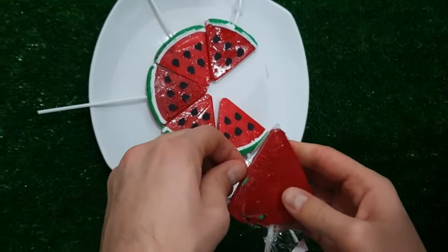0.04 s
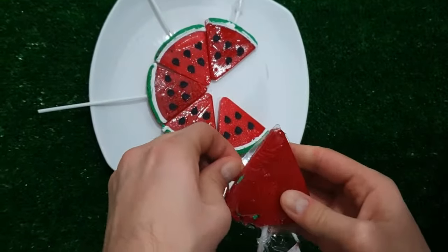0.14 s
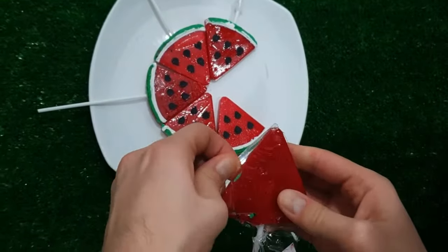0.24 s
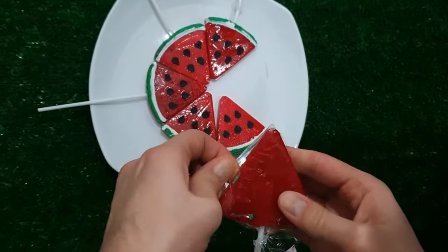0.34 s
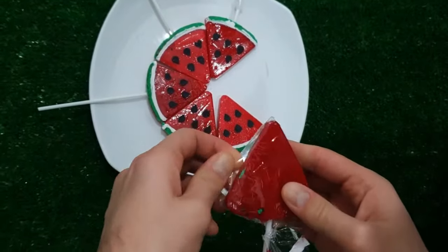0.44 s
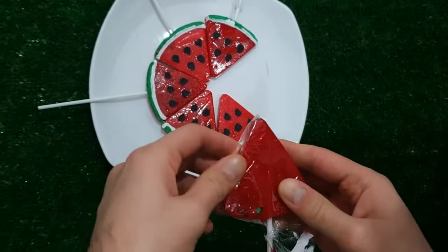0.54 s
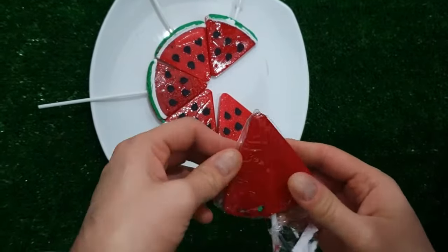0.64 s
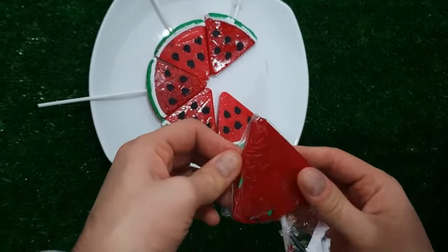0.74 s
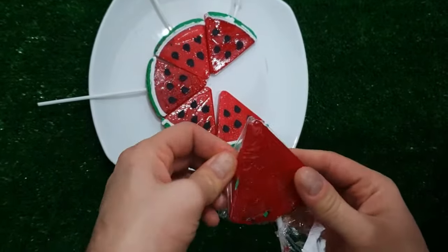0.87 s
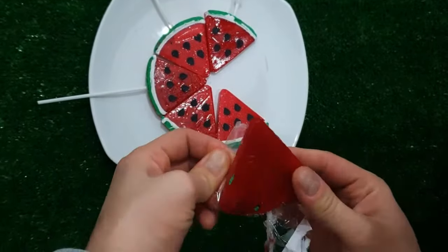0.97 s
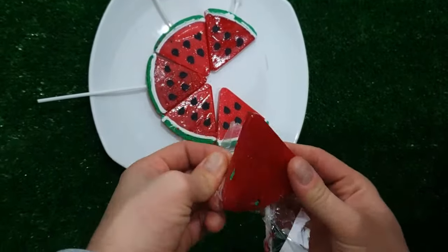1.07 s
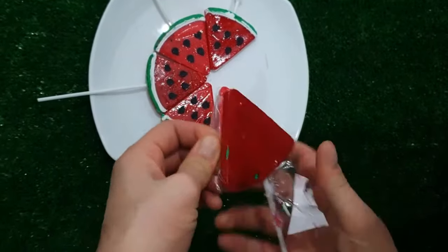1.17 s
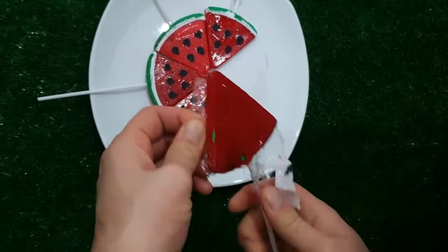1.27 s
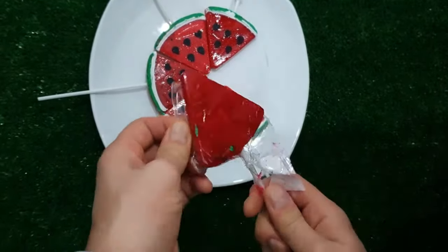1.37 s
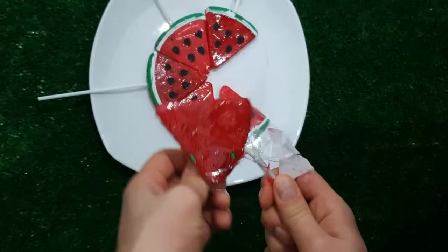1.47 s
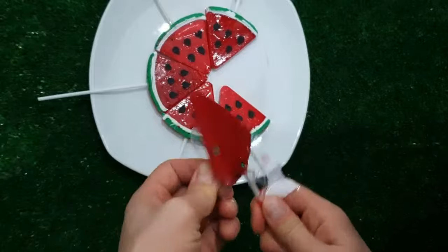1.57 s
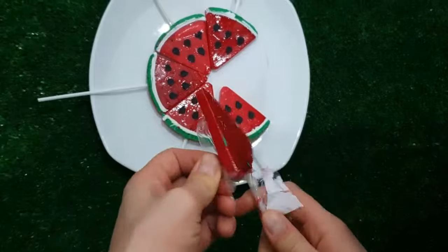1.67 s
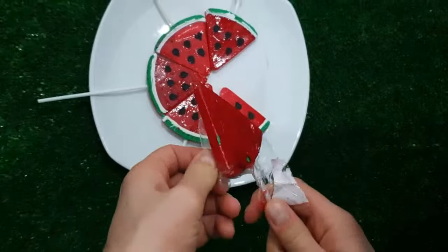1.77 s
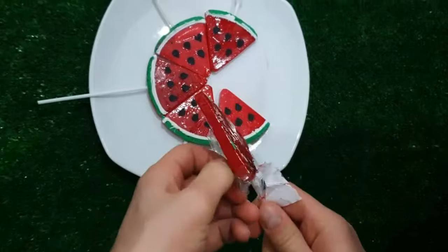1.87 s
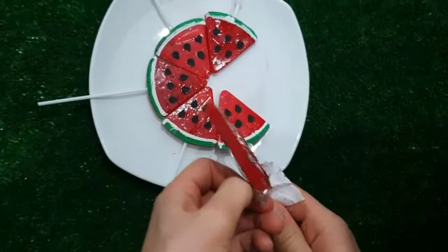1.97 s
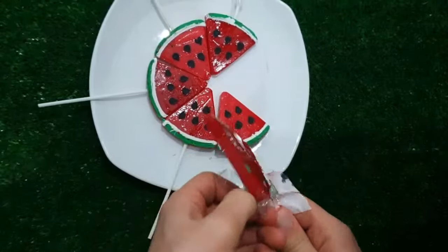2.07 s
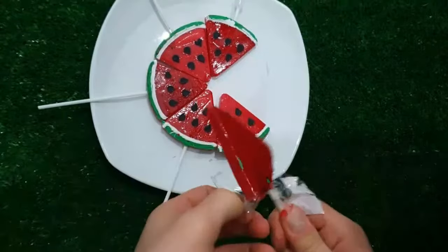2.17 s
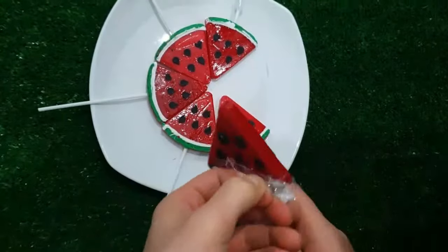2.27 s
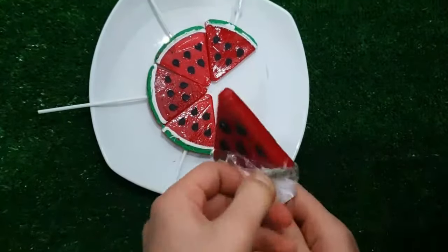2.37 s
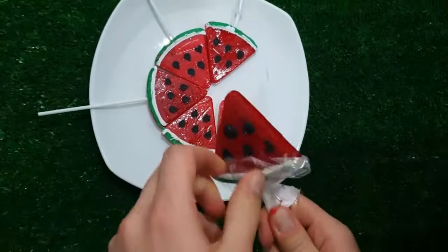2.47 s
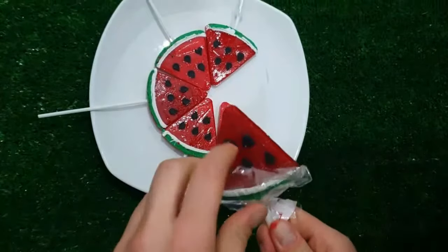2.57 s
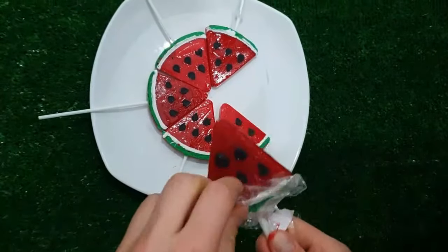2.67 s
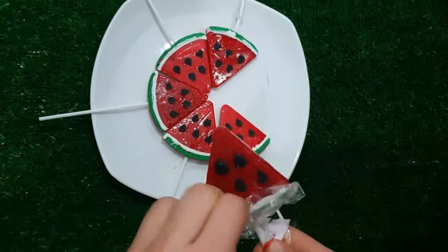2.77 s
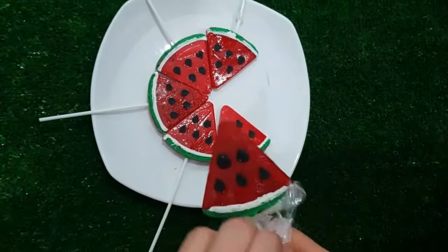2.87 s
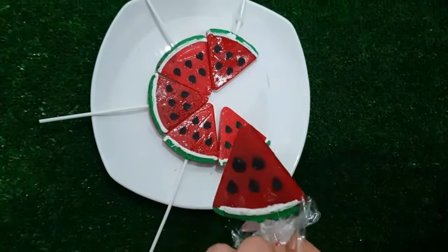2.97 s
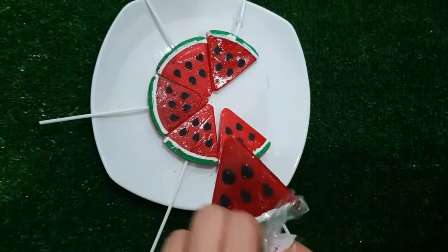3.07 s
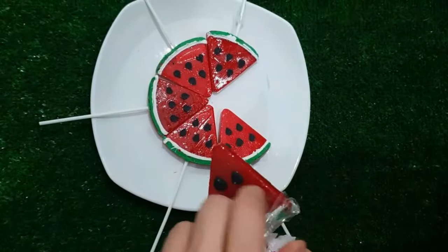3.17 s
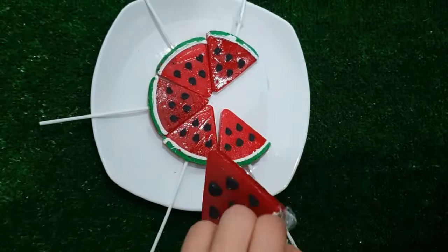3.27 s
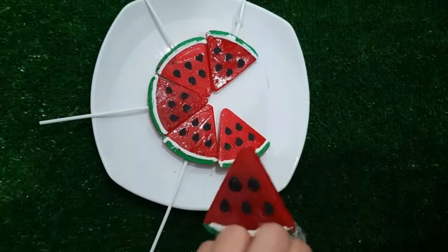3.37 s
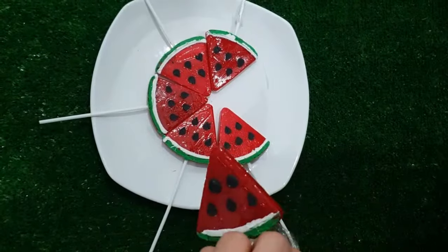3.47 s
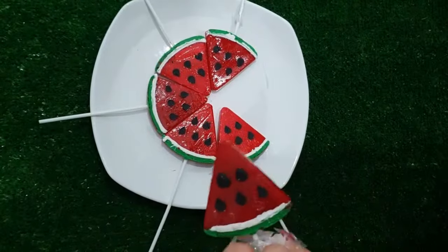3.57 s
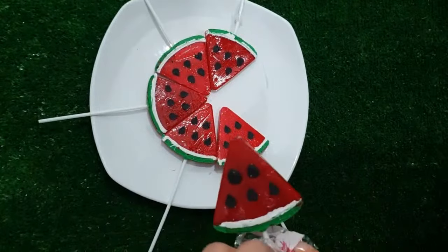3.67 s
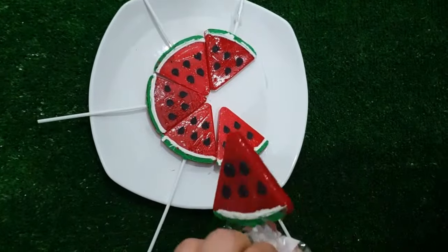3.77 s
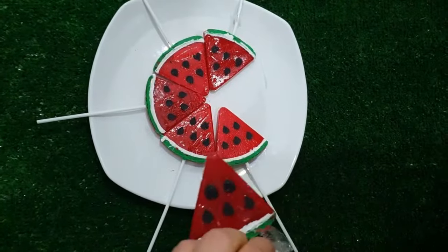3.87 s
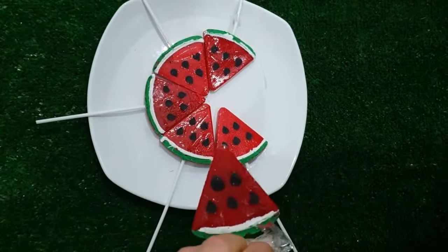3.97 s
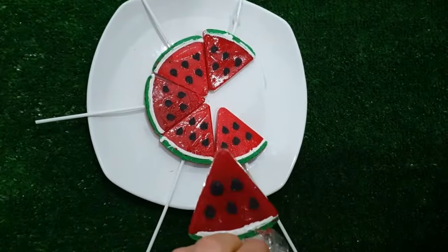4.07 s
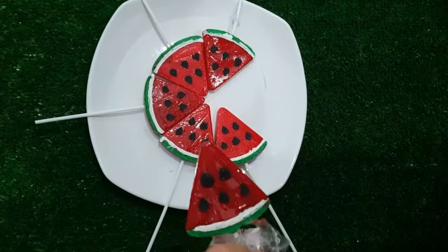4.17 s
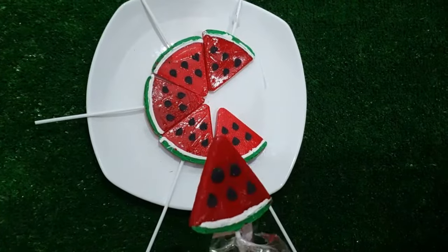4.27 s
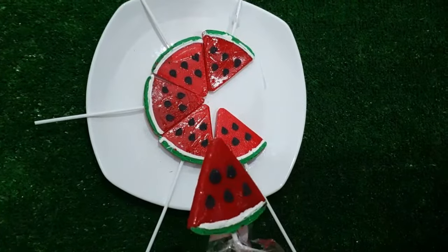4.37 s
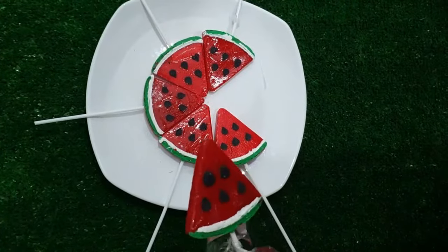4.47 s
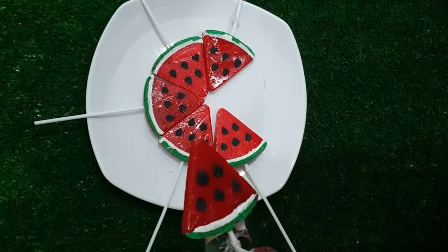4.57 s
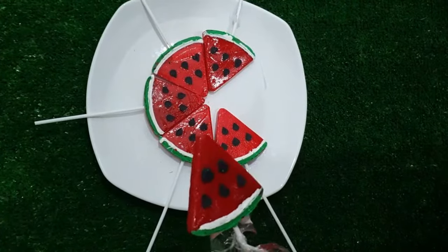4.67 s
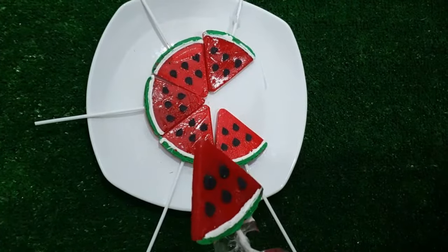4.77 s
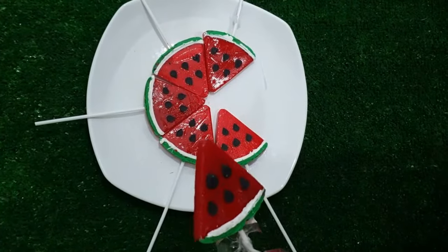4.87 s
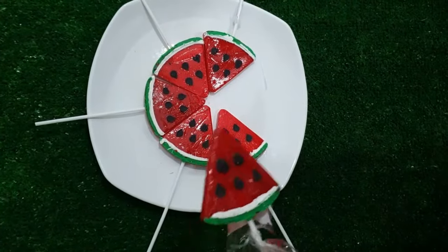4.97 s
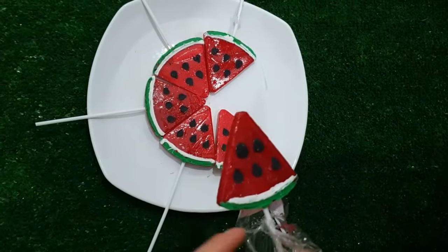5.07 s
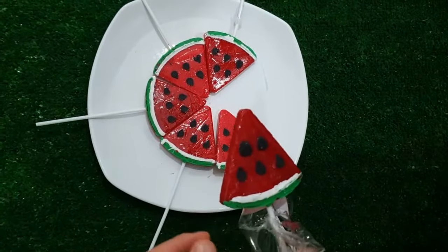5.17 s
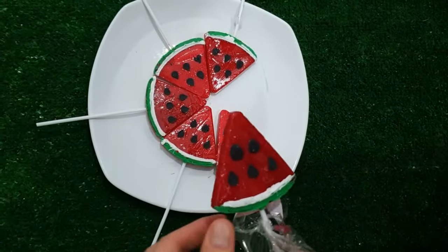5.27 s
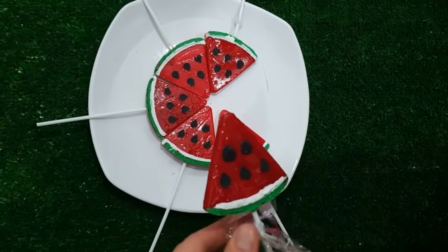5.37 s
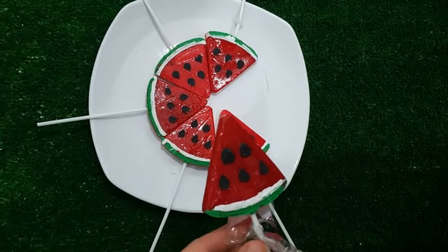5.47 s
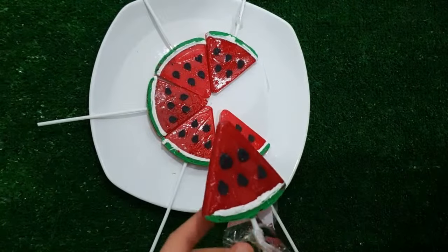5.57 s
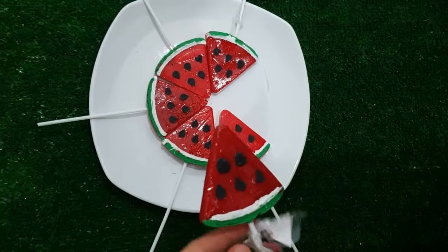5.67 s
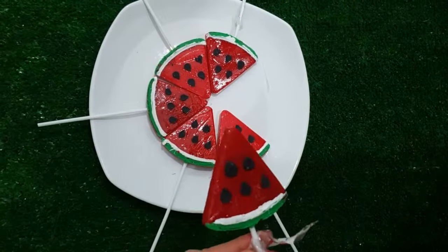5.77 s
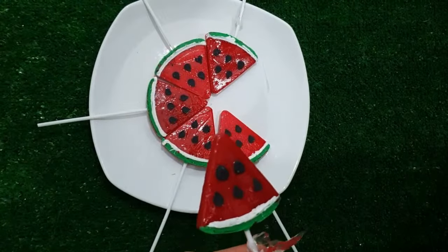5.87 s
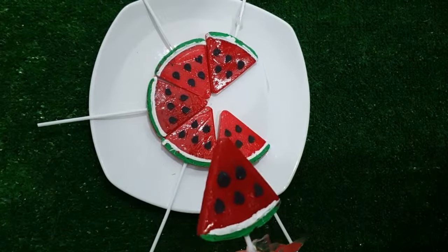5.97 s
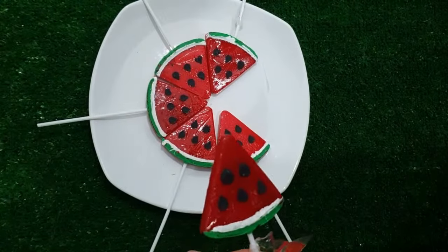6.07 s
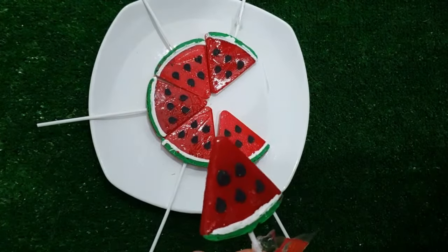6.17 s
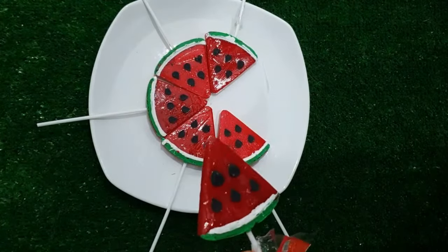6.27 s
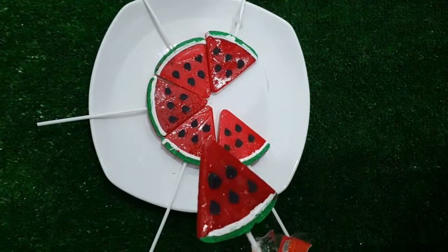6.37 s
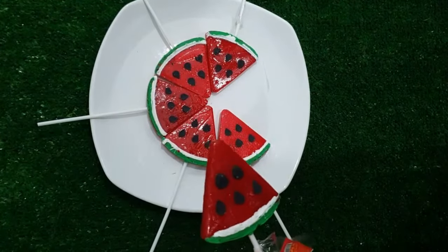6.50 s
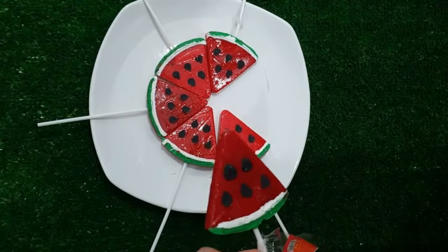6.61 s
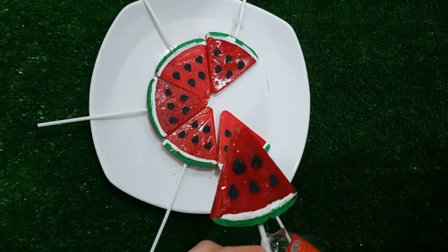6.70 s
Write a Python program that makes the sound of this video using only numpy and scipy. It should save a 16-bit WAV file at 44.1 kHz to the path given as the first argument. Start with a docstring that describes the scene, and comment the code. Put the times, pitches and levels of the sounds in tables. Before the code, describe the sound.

Fingers pull a stiff clear wrapper off a hard lollipop, close to the microphones in a small quiet room. The plastic crackles in uneven tugs, mixing swarms of tiny ticks with sharp single snaps and a few soft, dull handling bumps. The crinkling is busiest around the middle, pauses briefly, resumes, then thins to a few light ticks. A faint low hum and rumble lie underneath.

```python
"""Unwrapping a hard candy.

Fingers pull a stiff clear wrapper off a candy, close to a pair of microphones in a small quiet room.
Creases buckle as single snaps and as swarms of small ticks; the room smears them into short tails.
A dull low noise swells and fades with the crinkling, with soft bumps now and then.
A low hum throbs over a steady rumble."""
import sys
import numpy as np
from scipy import signal
from scipy.fft import rfft, irfft
from scipy.io import wavfile
from scipy.ndimage import uniform_filter1d

SR = 44100
rng = np.random.default_rng(int(sys.argv[2]) if len(sys.argv) > 2 else 0)


def log_audio(samples):
    """Write samples as a 16-bit WAV file to the path given in sys.argv[1]."""
    # one column per channel
    frames = np.atleast_2d(samples).T
    # limit to full scale, then quantise
    limited = np.clip(frames, -1, 1)
    pcm = np.round(limited * 32767).astype(np.int16)
    wavfile.write(sys.argv[1], SR, pcm)


N = 297234
TIME_S = np.arange(N) / SR
CONTROL_S = np.arange(0, N + 32, 32) / SR   # envelope points, 32 samples apart


def wrapper(pull_db, low_db, treble_db):
    """The crinkle: swarming ticks, clear snaps and lesser snaps, all coloured by the stiff film."""
    # the clearest creases that buckle: start_s, level_db, pitch_hz, low_db, treble_db (both against mids)
    creases = [(0.034, -24, 4030, -31, 7), (0.1226, -36, 4310, -24, -2), (0.1424, -27.5, 6560, -11, 7.5),
               (0.1713, -15.5, 3500, -22, 10.5), (0.1909, -20.5, 6040, -18, 9.5),
               (0.2362, -8, 3600, -17, -8), (0.384, -48.5, 6830, -14, 12), (0.4274, -37, 5950, -23, 15.5),
               (0.4646, -21.5, 3430, -9, 4.5), (0.4783, -33, 6600, -27, 15), (0.4932, -25, 2970, -22, 6.5),
               (0.5098, -19.5, 2030, -6.5, -3), (0.592, -50, 1350, 8, -14), (0.6018, -26.5, 3510, -25, -10),
               (0.66, -14.5, 2350, -20, -8), (0.739, -28, 2900, -7, -4), (0.7583, -28.5, 5400, -26, 5),
               (0.8304, -36, 5630, -24, 14), (0.8844, -22, 2860, -10, 3), (0.954, -21.5, 2820, -30, -6),
               (0.9742, -7, 2560, -17, -1), (0.9954, -7.5, 3380, -10.5, -17), (1.1416, -18.5, 1970, -2, -7),
               (1.1531, -27.5, 1960, 4.5, -8), (1.242, -30.5, 5860, -2, 9), (1.364, -48, 1910, 7, -12),
               (1.3959, -27.5, 4590, -13, 16), (1.4402, -23, 2430, -20, -5), (1.4493, -27, 6200, -9, 10),
               (1.469, -25, 1710, -4, -3), (1.4951, -20.5, 3740, -8, -14), (1.5594, -30, 5680, -21, -1),
               (1.5863, -34, 5950, -15, -2), (1.611, -37, 1260, 3.5, 10), (1.6552, -12.5, 6040, -30, -15),
               (1.7112, -38, 1170, 5, 6), (1.724, -35.5, 5530, 4.5, 14), (1.7555, -27.5, 7000, -14, 4.5),
               (1.7721, -24, 3700, -17, -9), (1.9034, -28, 6240, -25, 14.5), (1.9193, -31, 4760, -17, 10),
               (1.9858, -30.5, 1150, -8, 21.5), (2.0038, -16, 6640, -13, -21), (2.1054, -39, 5670, -21, 20),
               (2.1198, -24, 6060, 0.5, 4), (2.1389, -19.5, 1140, -5, 7.5), (2.1889, -36.5, 6290, -4, 18),
               (2.2386, -34.5, 4900, -13, 23), (2.254, -27, 6700, -11, 16.5),
               (2.2749, -16.5, 4570, -15, -14), (2.2907, -7.5, 6060, -30, -14),
               (2.4073, -20, 6600, -30, 4.5), (2.4188, -14.5, 4870, -29, -4), (2.4894, -26, 2670, -5, 0),
               (2.5, -33.5, 2580, -3, -7), (2.5256, -20, 6100, -30, -27), (2.5541, -22.5, 4500, -15, -3),
               (2.5952, -37.5, 3530, -3, 19), (2.6436, -32, 6290, -20, -7), (2.6782, -40, 5200, -8, 18),
               (2.723, -42, 2550, 6, -12), (2.7637, -19.5, 6500, -30, 9), (2.772, -18, 6610, -23, -6),
               (2.8322, -9, 2840, -16, -21), (2.8534, -9.5, 2840, -26, -3.5),
               (2.8733, -6.5, 2760, -19.5, -15), (2.8846, -14, 2800, -5, 7.5),
               (2.8985, -14.5, 1960, -5, -18), (2.9074, -12.5, 2840, -5, -13), (2.9427, -27, 2730, 11.5, 2),
               (3.0501, -33, 5900, -7, 11), (3.068, -27.5, 6900, -17, 7), (3.0896, -28.5, 4770, -2, 10),
               (3.1449, -29, 2700, 8, -3), (3.1918, -28, 2510, 3, -9), (3.2679, -25, 6260, -6.5, 2),
               (3.3308, -20, 4390, -16, -7), (3.3699, -19, 2760, -22, -17), (3.386, -24.5, 3770, -27, 10.5),
               (3.4075, -14.5, 3300, -2, 0), (3.4208, -7, 6200, -22, -2), (3.575, -19, 2460, -18, 3.5),
               (3.6008, -12.5, 2360, -8, -28), (3.6489, -30, 2590, -1, -5), (3.7182, -18.5, 1950, -21, -7),
               (3.7284, -29, 4480, -23, 17.5), (3.7914, -33, 1250, -3, -5), (3.982, -31.5, 3520, -30, 9),
               (4.065, -41, 4000, 7, 1), (4.1105, -40.5, 2480, 2, -17), (4.1539, -31, 1990, 0, -6),
               (4.165, -25.5, 3490, -12, -4), (4.1794, -26.5, 2540, -1.5, -10),
               (4.2161, -9.5, 2300, -27, -29), (4.2719, -15.5, 2550, -18, -5),
               (4.3461, -30.5, 6500, -23, 11), (4.3696, -38, 6170, -4, -2), (4.3813, -42, 5800, -21, 11),
               (4.402, -34, 6140, -22, 6), (4.427, -20, 2900, -30, 5.5), (4.4718, -18, 3730, -30, -28),
               (4.5263, -26.5, 3760, -30, -3), (4.7531, -56, 5200, -5, 23.5),
               (4.808, -35.5, 4800, -15, 0.5), (4.954, -37.5, 5530, -8.5, -12), (4.9744, -36, 3020, -23, 9),
               (5.0207, -23.5, 5140, -24, 13), (5.0321, -30, 5320, 0, -5), (5.1495, -55, 4700, 7, 23),
               (5.2078, -40, 3900, -29, -4), (5.378, -40, 6970, -18, 2), (5.3952, -30, 6300, -21, 6),
               (5.411, -38.5, 5830, 1.5, 4), (5.436, -28.5, 6180, -20.5, 3), (5.4667, -37.5, 3210, 5, -15),
               (5.5435, -16.5, 6100, -30, -13), (5.554, -19, 3450, -19, 3), (5.573, -30, 2800, -1, 13),
               (5.6064, -24.5, 6000, -6, 7), (5.642, -41.5, 2020, 13, -13), (5.6861, -41, 2100, 10, -8),
               (5.694, -32, 4480, -17, 6), (5.721, -22.5, 2320, -18, -5), (5.7486, -33, 2970, -5.5, -1),
               (5.7823, -31.5, 6160, -18, 10), (5.8046, -25.5, 6460, -30, 4.5),
               (5.8564, -39, 5990, -16, 12), (5.887, -34, 5790, -13, 2), (5.923, -39.5, 3350, -12, -27),
               (5.9289, -17, 2000, -7, -6), (5.9584, -15, 2430, -16, -24), (6.0073, -28, 2340, -22, 2),
               (6.026, -25, 3650, -22, 4), (6.0392, -27, 6500, -30, -8), (6.066, -36.5, 2630, -4.5, 4),
               (6.1238, -40, 2270, -8, -11), (6.143, -36, 2580, -19, 6), (6.3027, -53.5, 6040, -16, 12.5),
               (6.3502, -38, 6700, -9.5, -3), (6.4265, -48, 7000, -20, 9), (6.4748, -36.5, 6180, -30, 6.5),
               (6.5006, -49, 6600, -29, -22), (6.5078, -35, 4630, -26, 14), (6.517, -25.5, 3700, -30, 0),
               (6.6533, -30, 6260, -30, -5), (6.6769, -31.5, 6290, -30, -4)]
    # tone of the film: frequency_hz, gain_db
    film_tone = [(200, -12), (500, -4), (1300, 5), (3000, 3.5), (4200, 0), (6600, -1), (7600, -5.5),
                 (8600, 3), (12500, 3), (15500, 0.5)]
    ticks = tick_swarm(pull_db, low_db, treble_db)
    cracks = snaps(np.r_[creases, lesser_creases(pull_db)])
    return colour(ticks + cracks, lambda hz: at_hz(film_tone, hz))


def pull():
    """Tugs swell, sag and let go, adding in power; gives the mid level, and lows and treble against it."""
    # tugs on the film: full_at_s, rise_s (per 20 dB), hold_s, level_db, low_db, treble_db
    tugs = [(0.035, .02, .08, -53, -19, -2), (0.14, .05, .03, -54, -27, 2),
            (0.175, .007, .07, -37.5, -18, -3), (0.488, .065, .02, -41, -14, 2.5),
            (0.58, .05, .07, -53, -4.5, -9), (0.663, .01, .3, -49.5, -13, -4),
            (0.977, .006, .005, -28, -7, 0), (1.163, .13, .1, -43.5, -7, -3),
            (1.399, .007, .03, -51, -18, 4), (1.467, .065, .005, -33, -11, -3.5),
            (1.59, .07, .15, -44.5, -11, -1), (1.902, .17, .05, -47.5, -13, 4),
            (2.012, .19, .002, -42.5, -13, -3), (2.108, .007, .11, -46, -6, 4),
            (2.286, .09, .005, -33, -18, -4.5), (2.414, .19, .05, -41.5, -15, -8),
            (2.52, .1, .11, -50, 0, -4), (2.688, .1, .07, -50, -9, -2), (2.767, .01, .04, -44.5, -7, -1),
            (2.828, .03, .11, -28.5, -12.5, -8), (3.07, .05, .06, -42, -9, -1),
            (3.16, .1, .07, -44, -3, -8), (3.273, .05, .02, -37.5, -13, -3), (3.36, .1, .04, -45, -8, -5),
            (3.411, .008, .005, -26.5, -11.5, -8.5), (3.603, .1, .03, -38, -9, -9),
            (3.722, .01, .05, -39, -10, -2), (3.82, .15, .09, -45, -3.5, -4), (4.0, .1, .03, -58, -8, -1),
            (4.068, .02, .015, -50, -7, -2), (4.194, .055, .08, -38.5, -11, -8.5),
            (4.37, .1, .04, -57, -9, -2), (4.43, .007, .045, -41.5, -22, -6), (4.56, .1, .1, -74, 9, -9),
            (4.756, .01, .03, -72, -3, 4), (4.811, .012, .005, -60, -15, -9),
            (4.975, .02, .01, -48, -24, 8), (5.027, .06, .005, -38, -5.5, -3),
            (5.405, .032, .14, -51, -6, -7), (5.557, .01, .05, -43, -11, -7), (5.724, .2, .1, -46, -11, -5),
            (5.933, .012, .035, -43, -18, -13), (6.03, .1, .05, -53.5, -9.5, -6),
            (6.2, .2, .22, -72, 0, -1), (6.48, .05, .02, -69, -22, -3), (6.511, .015, .005, -52, -19, -2),
            (6.656, .008, .02, -60, -20, -3)]
    full_at_s, rise_s, hold_s, level_db, low_db, treble_db = np.transpose(tugs)[:, :, None]
    sag_db_per_s, release_db_per_s, rest_db = 14, 200, -80
    since = CONTROL_S - full_at_s
    fall_db = sag_db_per_s * np.minimum(since, hold_s) + release_db_per_s * np.maximum(since - hold_s, 0)
    tug_db = level_db - np.where(since < 0, -20 * since / rise_s, fall_db)

    def summed_db(each_db, floor_db):
        return 10 * np.log10(from_db(2 * each_db).sum(axis=0) + from_db(2 * floor_db))

    mids = summed_db(tug_db, rest_db)
    low = summed_db(tug_db + low_db, rest_db + 2)
    treble = summed_db(tug_db + treble_db, rest_db - 6)
    return per_sample(mids), per_sample(low - mids), per_sample(treble - mids)


def snaps(creases, crack_s=0.00035, shiver_s=0.0027, shiver_db=-14, panel_q=2.5, panel_db=2.5):
    """A crease flips: a crack of noise briefly rings its small panel, and the film shivers on."""
    size, alike = 600, 0.54   # samples per snap; share of power common to both microphones
    out, t = np.zeros((2, N + size)), np.arange(size) / SR
    fade = np.exp(-t / crack_s) + from_db(shiver_db) * np.exp(-t / shiver_s)
    noise = rng.standard_normal((len(creases), 3, size))
    cracks = (np.sqrt(alike) * noise[:, :1] + np.sqrt(1 - alike) * noise[:, 1:]) * fade
    panels = [band(crack, hz * (1 - .5 / panel_q), hz * (1 + .5 / panel_q))
              for crack, hz in zip(cracks, creases[:, 2])]
    bands = zip(*three_bands(cracks + from_db(panel_db) * np.array(panels)))
    for (start_s, level_db, _, low_db, treble_db), parts in zip(creases, bands):
        low, mids, treble = map(peak_one, parts)
        snap = from_db(low_db) * low + mids + from_db(treble_db) * treble
        start = round(start_s * SR)
        out[:, start:start + size] += from_db(level_db) * snap
    return out[:, :N]


def lesser_creases(pull_db, count=150, per_s=20, follow=.85, spread_db=2.5, tint_db=6):
    """Rows for snaps(): smaller creases buckle at random moments, louder when the film is pulled hard."""
    start_s = np.cumsum(rng.exponential(size=count)) / per_s
    pitch_hz = 1400 * (6900 / 1400) ** rng.random(count)
    strength, low, treble = rng.normal(size=(3, count))
    swing_db = np.interp(start_s, TIME_S, pull_db - pull_db.mean())
    level_db = -45 + follow * swing_db + spread_db * strength
    creases = np.transpose([start_s, level_db, pitch_hz, -12 + tint_db * low, 1.5 + tint_db * treble])
    return creases[start_s < N / SR]


def tick_swarm(pull_db, low_db, treble_db, tick_s=0.0012, clump_db=2.0, spread_db=1.5, tint_db=1.5):
    """Tiny creases tick in random clumps, faster under a strong pull; each tick is a puff of noise."""
    per_s = 1500 * from_db(0.18 * (pull_db + 48.5) + clump_db * drift(30))
    sizes = from_db(spread_db * np.minimum(rng.exponential(1, N), 4.5)) / np.sqrt(per_s)
    ticks = sizes * (rng.random(N) < per_s / SR)
    fade = np.exp(-1 / (tick_s * SR))
    puffs = signal.lfilter([1], [1, -fade], ticks + 1e-18)
    low = three_bands(puffs * stereo_noise(alike=0.66))[0]   # long waves reach both microphones alike
    mids, treble = three_bands(puffs * stereo_noise(alike=0.28))[1:]
    # creases differ in size, so the colour flickers
    low, mids, treble = [rms_one(part) * from_db(tint_db * drift(60)) for part in (low, mids, treble)]
    return from_db(pull_db) * (from_db(low_db) * low + mids + from_db(treble_db) * treble)


def room(x, tail_db=-9, build_s=0.00067, table_echo_s=.0082, table_echo_db=-13.5, alike_below_hz=1500):
    """One echo off the table, and dense reflections that die band by band, wider in the treble."""
    # decay of the room: frequency_hz, t60_s, level_db
    decay = [(487, 0.25, -0.5), (2020, 0.21, -0.5), (5600, 0.15, -2.5), (15100, 0.067, 0)]
    t, tail = np.arange(SR // 2) / SR, 0
    mid, side = rng.standard_normal((2, len(t)))
    edges_hz = [125, 250, 500, 1000, 2000, 4000, 8000, 19200]
    for low, high in zip(edges_hz, edges_hz[1:]):
        hz = np.sqrt(low * high)
        reflections = stereo(mid, side, alike=1 / (1 + (hz / alike_below_hz) ** 2))
        fade_db = at_hz(decay, hz, column=2) - 60 * t / at_hz(decay, hz)
        tail = tail + band(reflections, low, high) * from_db(fade_db)
    tail = tail * (1 - np.exp(-t / build_s))
    tail = from_db(tail_db) * tail / np.sqrt(np.sum(tail ** 2) / 2)
    tail[:, round(table_echo_s * SR)] += from_db(table_echo_db)
    return signal.fftconvolve(x, tail, axes=1)[:, :N]


def dull_swell(pull_db, follow=.5, smooth_s=.15, rise_db_per_s=300, fall_db_per_s=130):
    """A dull low noise swells and fades with the crinkling, with soft bumps now and then."""
    # soft bumps: peak_s, level_db
    bumps = [(0.05, -57), (0.28, -56), (0.52, -55), (0.7, -59), (0.99, -47), (2.15, -49), (2.5, -53),
             (2.62, -54), (3.15, -41), (3.21, -44), (3.5, -57), (5.05, -47), (5.65, -56), (5.85, -59)]
    # tone of the dull noise: frequency_hz, relative_db
    dull_tone = [(50, -13), (120, 4), (250, 10.5), (600, 2.5), (1000, -8)]
    swell_db = -65 + follow * (uniform_filter1d(pull_db, int(smooth_s * SR)) - pull_db.mean())
    peak_s, level_db = np.transpose(bumps)[:, :, None]
    since = CONTROL_S - peak_s
    bump_db = level_db + np.where(since < 0, rise_db_per_s, -fall_db_per_s) * since
    envelope_db = np.maximum(swell_db, per_sample(bump_db.max(axis=0)))
    return from_db(envelope_db + drift(30)) * shaped_noise(dull_tone, alike=.75)


def hum(dip_s=2.5):
    """Close low tones beat against each other; neighbours oppose at dip_s."""
    # tones of the hum: pitch_hz, level_db
    tones = [(46.75, -73), (49.25, -67.8), (51.86, -64.8), (93.8, -78)]
    return sum((-1) ** k * from_db(db) * np.sqrt(2) * np.cos(2 * np.pi * hz * (TIME_S - dip_s))
               for k, (hz, db) in enumerate(tones))


def rumble():
    """A steady bed of low noise."""
    # tone of the rumble: frequency_hz, relative_db
    rumble_tone = [(25, -5.5), (35, -6.5), (50, 7.5), (80, 3), (122, 4.5), (140, -1), (200, -15.5),
                   (260, -3.5), (400, -18.5), (800, -36.5)]
    return from_db(-65.5) * band(shaped_noise(rumble_tone, alike=.6), 18, 1500)


def hiss():
    """A faint, wide noise floor."""
    # tone of the hiss: frequency_hz, relative_db
    hiss_tone = [(240, -10.5), (400, 7), (723, -43), (927, -25.5), (6590, -32.5), (7700, -15), (12700, -27),
                 (16500, -52)]
    return from_db(-82) * shaped_noise(hiss_tone, alike=.2)


def from_db(db):
    """Decibels to gain."""
    return 10 ** (np.asarray(db) / 20)


def rms_one(x):
    """Scale to rms 1."""
    return x / np.sqrt(np.mean(x ** 2) + 1e-20)


def peak_one(x):
    """Scale to peak 1."""
    return x / np.abs(x).max()


def per_sample(envelope):
    """Envelope points joined up at every sample."""
    return np.interp(TIME_S, CONTROL_S, envelope)


def at_hz(curve, hz, column=1):
    """Read a curve on a log-frequency axis."""
    curve = np.array(curve)
    return np.interp(np.log(hz + 1), np.log(curve[:, 0]), curve[:, column])


def colour(x, db_of_hz, size=2048):
    """Minimum-phase EQ with the given gain at each frequency."""
    cepstrum = irfft(db_of_hz(np.fft.rfftfreq(size, 1 / SR)) * np.log(10) / 20)
    cepstrum[1:size // 2] *= 2
    cepstrum[size // 2 + 1:] = 0
    impulse = irfft(np.exp(rfft(cepstrum)))
    return signal.fftconvolve(x, np.array(impulse, ndmin=x.ndim), axes=-1)[..., :N]


def band(x, low_hz, high_hz):
    """Band-pass."""
    return signal.sosfilt(signal.butter(2, [low_hz, high_hz], "band", fs=SR, output="sos"), x)


def three_bands(x):
    """Lows, mids and treble; the mids are inverted so the bands join without notches."""
    return band(x, 350, 2000), -band(x, 2000, 7000), band(x, 7000, 20000)


def drift(rate_hz, step=40):
    """A smooth random wobble, rms 1."""
    pole = np.exp(-2 * np.pi * rate_hz * step / SR)
    slow = signal.lfilter([1], [1, -2 * pole, pole * pole], rng.standard_normal(N // step + 2002))[2000:]
    return np.interp(np.arange(N) / step, np.arange(len(slow)), rms_one(slow))


def stereo(mid, side, alike):
    """Mid and side to left and right; alike runs from 0 (wide) to 1 (mono)."""
    return np.sqrt(1 + alike) * mid + np.sqrt(1 - alike) * side * np.array([[1], [-1]])


def stereo_noise(alike):
    """White noise, partly shared by left and right."""
    return stereo(*rng.standard_normal((2, N)), alike)


def shaped_noise(tone, alike):
    """Stereo noise with the given tone curve, rms 1."""
    return rms_one(colour(stereo_noise(alike), lambda hz: at_hz(tone, hz), size=8192))


def scene(left_lag_s=0.00015):
    """The wrapper and its reflections at the two microphones, over a dull swell, hum, rumble and hiss."""
    # stereo balance of the wrapper: frequency_hz, left_minus_right_db
    balance = [(150, -15), (700, -0.5), (2400, 3.5), (4400, -7.5), (8000, 1), (14000, -2)]
    pull_db, low_db, treble_db = pull()
    low_bed = (hum() + rumble()) * from_db([[1.2], [-1.2]])   # leans left
    background = low_bed + dull_swell(pull_db) + hiss()
    crinkle = wrapper(pull_db, low_db, treble_db)
    lag = round(left_lag_s * SR)   # the left microphone hears the crinkle slightly later
    direct = np.array([np.r_[np.zeros(lag), crinkle[0, :N - lag]], crinkle[1]])
    heard = direct + room(crinkle)
    left = colour(heard[0], lambda hz: at_hz(balance, hz) / 2)
    right = colour(heard[1], lambda hz: -at_hz(balance, hz) / 2)
    return np.array([left, right]) + background


def record(dry):
    """A steep low-pass cuts the top at 15.9 kHz."""
    return signal.sosfilt(signal.ellip(10, .5, 70, 15900, fs=SR, output="sos"), dry)


dry = scene()
out = record(dry)
log_audio(out)
```